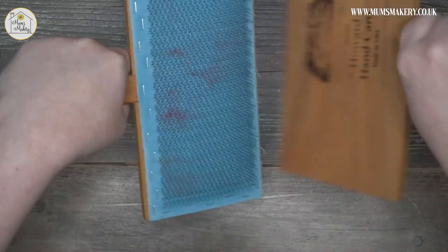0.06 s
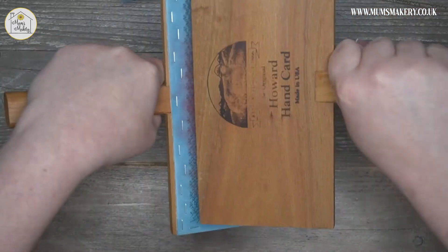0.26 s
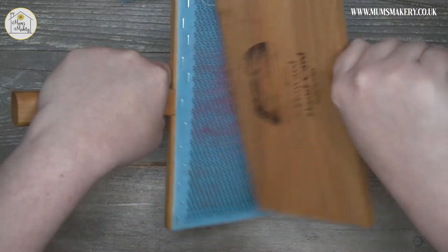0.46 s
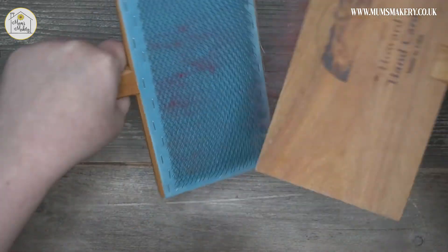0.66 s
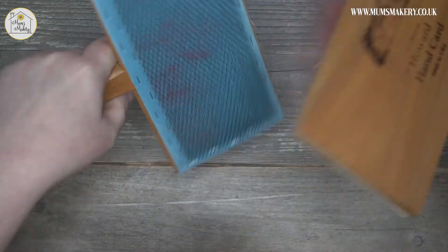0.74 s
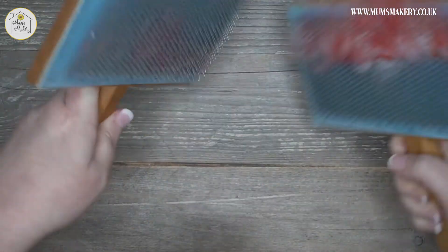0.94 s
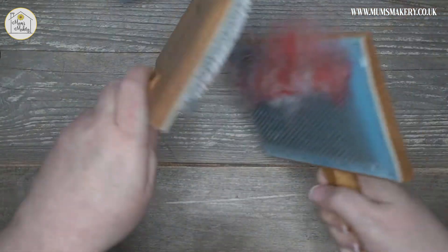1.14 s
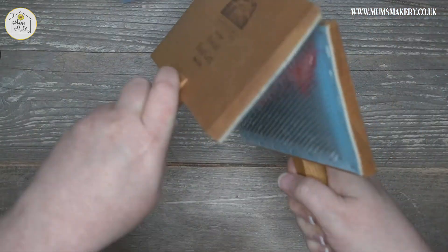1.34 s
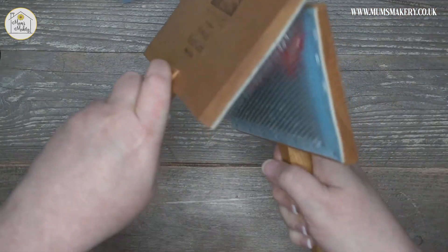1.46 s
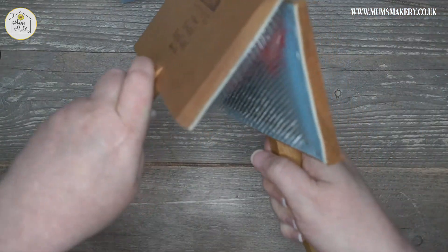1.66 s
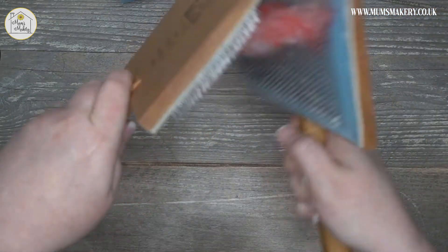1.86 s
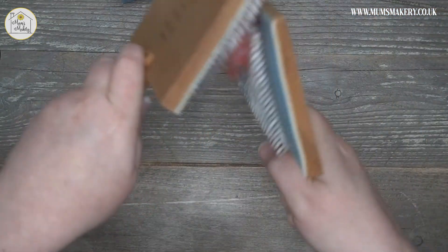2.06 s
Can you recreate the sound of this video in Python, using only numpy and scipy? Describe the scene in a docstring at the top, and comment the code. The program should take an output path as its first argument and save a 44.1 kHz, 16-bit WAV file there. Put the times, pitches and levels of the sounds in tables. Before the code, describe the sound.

Wire-toothed wool carders scrape past each other in short scratchy strokes, teeth twanging, close and dry

```python
"""A light scratch of wire teeth, then dull bumps: two wooden hand carders comb wool over a table, small room, close mic.
One card lands on the other and is dragged off in a rasp of slipping teeth, and the wool tears softly as they part.
Then they meet at an angle: single teeth snag and spring free as twanging clicks, and a short sweep lifts the wool.
Both strokes are noisy clicks through wire and wood filters, with noise ringing through the paddles' resonances.
A short room tail and a quiet rumbling floor lie behind; the one microphone feeds both channels alike."""
import sys
import numpy as np
from scipy import signal
from scipy.fft import rfft, irfft
from scipy.io import wavfile
from scipy.ndimage import uniform_filter1d

SR = 44100
rng = np.random.default_rng(int(sys.argv[2]) if len(sys.argv) > 2 else 0)


def persist_wave(psi):
    """Save psi, clipped to +-1, as 16-bit WAV."""
    counts = np.round(np.clip(psi, -1, 1) * 32767).astype(np.int16)
    wavfile.write(sys.argv[1], SR, np.atleast_2d(counts).T)


N = 92610
T = np.arange(N) / SR


def amp(db):
    """Turns dB into a linear gain."""
    return 10 ** (np.asarray(db) / 20)


def evened(x):
    """Scales to rms 1."""
    return x / np.sqrt(np.mean(x ** 2) + 1e-20)


def steady(x, size=700):
    """Holds the short-term level near 1 and leaves the fine grain alone."""
    power = uniform_filter1d(uniform_filter1d(x ** 2, size), size)
    return x / np.sqrt(power + 1e-12)


def read(points, hz):
    """Reads a curve over frequency on a log-frequency axis."""
    f, value = np.transpose(points)
    return np.interp(np.log(hz + 1), np.log(f + 1), value)


def level(rows, axis=1):
    """Gain over time from one dB column; silent outside the curve."""
    rows = np.array(rows)
    inside = (T >= rows[0, 0]) * (T <= rows[-1, 0])
    return amp(np.interp(T, rows[:, 0], rows[:, axis])) * inside


def add(mix, s, sound):
    """Mixes a sound in at time s."""
    part = mix[max(round(s * SR), 0):][:len(sound)]
    part += sound[:len(part)]


def colour(x, points, size=4096):
    """Causal minimum-phase filter with the given spectrum, keeping the power of white noise."""
    hz = abs(np.fft.fftfreq(size, 1 / SR))
    log_gain = np.log(amp(np.maximum(read(points, hz), -100)))
    # The Hilbert transform of the log gain gives the minimum phase.
    taps = np.fft.ifft(np.exp(np.conj(signal.hilbert(log_gain)))).real[:size // 2]
    return signal.fftconvolve(x, taps / np.linalg.norm(taps))[:len(x)]


def ring(x, hz, width):
    """One resonance, a decaying complex pole, keeping the power of white noise."""
    r = np.exp(-np.pi * width / SR)
    pole = r * np.exp(2j * np.pi * hz / SR)
    return signal.lfilter([np.sqrt(2 * (1 - r * r))], [1, -pole], x).real


def slips(per_s, spread_db, hiss):
    """Random clicks of teeth slipping over each other, with the hiss of the fibres between them."""
    size = amp(spread_db * np.minimum(rng.exponential(1, N), 3.5))
    clicks = size * rng.choice([-1, 1], N) * (rng.random(N) < per_s / SR)
    return evened(evened(clicks) + hiss * rng.standard_normal(N))


def burst(hold_s, decay_s, size=6000):
    """A short noise rattle that holds and dies away."""
    t = np.arange(size) / SR
    return rng.choice([-1., 1.], size) * np.exp(-np.maximum(t - hold_s, 0) / decay_s)


# Wires of the meshed beds. Each row: pitch in Hz, width in Hz, relative level in dB.
WIRE_MODES = [(2010, 30, -6.5), (3640, 300, -12), (4430, 40, -26.5), (7780, 150, -15.5)]
# Wooden paddle struck by its teeth; single snags use it too. Each row: frequency in Hz, relative level in dB.
PADDLE_SPECTRUM = [(60, -37.5), (170, -25), (290, -1), (550, 6.5), (800, -2.5), (1150, -0.5), (1600, -2),
                   (3000, -40)]
RING_ABOVE_HZ = 850  # higher paddle modes follow the ring curve, the others the wood curve


def drag(curve, wire_colour, modes, per_s, spread_db, wire_db, twang_db, wood_db, low_db, ring_db):
    """Slipping teeth rasp and twang; the paddle's modes ring as noise, and three curves shape wire, wood and ring."""
    drive = slips(per_s, spread_db, hiss=.5)
    wire = colour(drive, wire_colour)
    for hz, width, db in WIRE_MODES:
        wire += amp(twang_db + db) * ring(drive, hz, width)
    low_modes, high_modes = np.zeros((2, N))
    for hz, width, db in modes:
        mode = amp(db) * ring(rng.standard_normal(N), hz, width)
        if hz <= RING_ABOVE_HZ:
            low_modes += mode
        else:
            high_modes += mode
    wood = amp(wood_db) * colour(drive, PADDLE_SPECTRUM) + evened(low_modes)
    out = amp(wire_db) * steady(wire) * level(curve, axis=1)
    out += amp(low_db) * steady(wood) * level(curve, axis=2)
    # Hand and wool stop the modes as the pull eases: the ring curve falls away with the stroke.
    return out + amp(ring_db) * steady(high_modes) * level(curve, axis=3)


# The long pull. Each row: time in seconds, then wire rasp, wood and paddle ring in dB before the trims below.
LONG_PULL = [(0.28, -81, -71, -80), (0.3, -71.5, -61, -65), (0.386, -55, -47.5, -58),
             (0.394, -48, -40.5, -42.5), (0.415, -45, -41.5, -46), (0.447, -39.5, -41.5, -36.5),
             (0.458, -44.5, -50, -41), (0.468, -44, -45, -33.5), (0.484, -43, -41, -32.5),
             (0.498, -55.5, -59.5, -51), (0.538, -73.5, -62, -85), (0.56, -83, -79, -75)]
# Wire teeth in the long pull. Each row: frequency in Hz, relative level in dB.
PULL_SPECTRUM = [(760, -19), (1300, -3), (1430, -10), (1880, 3), (2000, -3.5), (2220, 2), (3010, -0.5),
                 (3760, -4), (4680, -9.5), (5900, -0.5), (6910, -7), (7750, -5.5), (9460, -17.5),
                 (14100, -15), (16000, -60)]
# Paddles with the cards flat together. Each row: pitch in Hz, width in Hz, relative level in dB.
FLAT_PADDLES = [(184.6, 29, -18), (266, 36, -11.5), (307, 25, -11), (353, 68, -7.5), (481, 26, -17),
                (544, 30, -16), (618, 25, -1), (699.6, 10, 3), (768, 20, -21), (864, 25, 0.5), (941, 22, 5),
                (1021, 18, 0), (1116, 22, 2.5), (1096, 18, -2), (1190, 40, 2), (1333, 22, 2.5)]


def long_drag():
    """One card is dragged off the other, teeth slipping while the flat paddles ring."""
    return drag(LONG_PULL, PULL_SPECTRUM, FLAT_PADDLES, per_s=2200, spread_db=3,
                wire_db=1, twang_db=2.5, wood_db=-3.5, low_db=0, ring_db=-2.5)


# The lifting sweep. Each row: time in seconds, then wire rasp, wood and paddle ring in dB before the trims below.
LIFTING = [(1.8, -55.5, -52, -42), (1.811, -40, -40, -42.5), (1.83, -41.5, -44.5, -40.5),
           (1.842, -51.5, -50, -48), (1.863, -55, -71, -51), (1.875, -67, -67, -66), (1.9, -82, -69, -75)]
# Wire teeth in the sweep. Each row: frequency in Hz, relative level in dB.
SWEEP_SPECTRUM = [(760, -16.5), (1300, 10), (1440, 9.5), (1820, -5.5), (2490, 3.5), (3010, -1.5),
                  (3790, 0.5), (4780, -6), (6350, -7), (6830, -3.5), (9270, -15), (12000, -19),
                  (16000, -35)]
# Paddles held at an angle. Each row: pitch in Hz, width in Hz, relative level in dB.
ANGLED_PADDLES = [(278, 130, 2), (427, 80, -5.5), (502, 110, 3.5), (713, 33, -1), (883, 27, 1),
                  (1028, 43, 5), (1148, 34, -10), (1480, 120, -7), (1917, 27, -5), (2610, 50, -29)]


def lift_sweep():
    """A short sweep lifts the wool: denser slips, less twang, and broader paddle modes."""
    return drag(LIFTING, SWEEP_SPECTRUM, ANGLED_PADDLES, per_s=3500, spread_db=2,
                wire_db=-0.5, twang_db=-17, wood_db=-3.5, low_db=-1, ring_db=-3.5)


# Single teeth springing free. Each row: start in seconds, snap in dB before its filter, wire pitch in Hz,
# wire level in dB, wood knock in dB before its filter.
SPRINGING_TEETH = [(0.2204, -60, 2500, -39.5, -60), (0.2607, -55, 3740, -45, -44.5),
                   (0.3965, -53, 2040, -38.5, -46), (0.410, -37, 2020, -37.5, -36.5),
                   (0.423, -41.5, 2020, -33, -59), (0.4352, -39, 3650, -30, -45),
                   (0.447, -31.5, 3750, -27, -41), (0.4525, -37.5, 3550, -45, -56),
                   (0.464, -33, 3790, -28, -51), (0.4695, -33.5, 1148, -32, -38.5),
                   (0.4801, -34.5, 988, -41, -37), (0.663, -68.5, 2540, -64, -84),
                   (0.7828, -56.5, 2260, -45.5, -72), (0.784, -72, 3060, -48.5, -73),
                   (1.3, -47, 1820, -47, -47), (1.307, -46.5, 3910, -41, -46.5),
                   (1.343, -48, 1103, -48.5, -66), (1.3483, -44.5, 3440, -47.5, -49),
                   (1.364, -46, 3420, -44, -47), (1.376, -56, 3360, -46, -70),
                   (1.389, -47.5, 3390, -33.5, -49), (1.3966, -41.5, 6000, -46, -47),
                   (1.4089, -60, 1090, -57, -45.5), (1.421, -63, 1220, -71, -78),
                   (1.4454, -60, 3300, -49.5, -51), (1.4497, -56, 1155, -62, -44.5),
                   (1.4731, -46, 1226, -55, -45.5), (1.498, -51, 2280, -49.5, -58),
                   (1.5165, -47, 4540, -48, -49), (1.536, -43.5, 1600, -61, -44),
                   (1.5709, -52, 715, -63, -47.5), (1.5967, -55, 2340, -52.5, -63),
                   (1.6183, -59, 2090, -53, -69), (1.6267, -47.5, 1413, -48, -45),
                   (1.6312, -51, 1394, -48, -47), (1.6567, -45.5, 8100, -41.5, -47.5),
                   (1.679, -47, 1920, -50, -51), (1.6902, -51.5, 1360, -54, -72),
                   (1.707, -55.5, 1390, -45, -49), (1.7918, -52, 1540, -49, -52),
                   (1.8141, -40.5, 1087, -34.5, -48), (1.8252, -41.5, 7800, -38, -50),
                   (1.83, -40, 2350, -39, -43.5), (1.8341, -60, 2470, -36.5, -68),
                   (1.848, -66, 3850, -39, -53), (1.86, -60, 3950, -44, -72),
                   (1.864, -70, 1066, -46.5, -77)]
# Faint ticks of handling. Each row: start in seconds, level in dB before the snap filter.
HANDLING_TICKS = [(0.175, -66.5), (0.286, -62), (0.722, -65.5), (0.805, -67), (0.857, -64), (1.213, -66)]
# The snap of a tooth. Each row: frequency in Hz, relative level in dB.
SNAP_SPECTRUM = [(760, -6.5), (1300, -32), (1440, -6), (1600, -6.5), (2740, -5), (3380, -2), (5310, -5),
                 (8080, -10), (14600, -27.5), (16000, -24)]
SNAP_S, KNOCK_S = 0.0024, 0.0045  # decay times in seconds
WIRE_CYCLES = 6.7  # cycles in which a twang falls to 1/e


def snags(size=6000):
    """A caught tooth snaps free, twangs briefly and knocks the paddle; handling ticks share its snap."""
    snap, wire, wood = np.zeros((3, N))
    t = np.arange(size) / SR
    for s, snap_db, hz, wire_db, wood_db in SPRINGING_TEETH:
        twang = np.sin(2 * np.pi * hz * t) * np.exp(-t * hz / WIRE_CYCLES)
        add(snap, s, amp(snap_db) * burst(0.00017, SNAP_S))
        add(wire, s, amp(wire_db) * twang)
        add(wood, s, amp(wood_db) * burst(0.00038, KNOCK_S))
    for s, db in HANDLING_TICKS:
        add(snap, s, amp(db) * burst(0.00019, SNAP_S))
    return colour(snap, SNAP_SPECTRUM) + wire + colour(wood, PADDLE_SPECTRUM)


# Beds of teeth meeting or parting. Each row: start in seconds, level in dB before the filter,
# hold in seconds, decay in seconds.
BEDS_MEETING = [(0.217, -45, 0.012, 0.01), (0.251, -55.5, 0.012, 0.017), (0.783, -53.5, 0.0011, 0.0054),
                (1.287, -54, 0.017, 0.017), (1.802, -46, 0.0039, 0.015), (2.093, -48, 0.017, .01)]
# The crunch of the beds. Each row: frequency in Hz, relative level in dB.
CRUNCH_SPECTRUM = [(90, -13.5), (200, -4.5), (420, 4), (700, 0), (1100, -0.5), (1720, -8.5), (2500, -5),
                   (3700, -10), (4400, -12.5), (5700, -12.5), (8900, -27), (12700, -35), (16000, -50)]


def landings():
    """Many teeth touch or part almost at once in a short crunch of filtered noise."""
    out = np.zeros(N)
    for s, db, hold_s, decay_s in BEDS_MEETING:
        add(out, s, amp(db) * burst(hold_s, decay_s))
    return colour(out, CRUNCH_SPECTRUM)


# Dull bumps of paddle and hand. Each row: start in seconds, level in dB before doubling and the envelope,
# pitch in Hz, decay in seconds.
HAND_BUMPS = [(0.156, -53, 120, 0.0053), (0.264, -57, 173, 0.023), (0.16, -70.5, 452, 0.01),
              (0.2295, -32.5, 450, 0.0032), (0.231, -35.5, 163, 0.0033), (0.233, -55.5, 79, 0.02),
              (1.298, -44, 102.4, 0.0043), (1.306, -37.5, 464, 0.0019), (1.812, -61, 144, 0.014),
              (1.992, -53, 108, 0.0055)]


def bumps(rise_s, size=8000):
    """Low knocks of the paddles in the hands: damped sines with a soft rise."""
    out, t = np.zeros(N), np.arange(size) / SR
    for s, db, hz, decay_s in HAND_BUMPS:
        envelope = (1 - np.exp(-t / rise_s)) * np.exp(-t / decay_s)
        add(out, s, 2 * amp(db) * np.sin(2 * np.pi * hz * t) * envelope)
    return out


# Light contact of the teeth, one curve per contact. Each row: time in seconds, level in dB before the trim.
LIGHT_CONTACTS = [
    [(0.0, -58), (0.04, -70.5), (0.12, -110)],
    [(1.283, -61), (1.295, -58), (1.346, -57), (1.41, -54.5), (1.466, -59), (1.514, -61), (1.55, -57),
     (1.61, -67), (1.665, -59), (1.72, -65.5), (1.79, -64.5)],
    [(1.88, -76.5), (2.0, -72.5), (2.065, -77), (2.1, -51)],
]
# The light scratch. Each row: frequency in Hz, relative level in dB.
SCRATCH_SPECTRUM = [(100, -18.5), (210, -17.5), (280, -3.5), (540, -2.5), (790, -3), (1100, -6.5),
                    (1660, -10.5), (2870, -13), (3500, -15), (5360, -19), (8070, -23.5), (12000, -34),
                    (16000, -41)]


def graze(graze_db):
    """Teeth brush lightly in a grainy scratch of slips and hiss."""
    drive = slips(per_s=1600, spread_db=3, hiss=.6)
    scratch = steady(colour(drive, SCRATCH_SPECTRUM))
    return amp(graze_db) * scratch * sum(level(curve) for curve in LIGHT_CONTACTS)


# Wool fibres pulling apart in the air. Each row: time in seconds, level in dB before the filter.
FIBRES_PARTING = [(0.62, -92), (0.74, -76.5), (0.8, -71.5), (0.86, -72), (0.92, -76), (1.03, -86),
                  (1.09, -78.5), (1.15, -83.5), (1.26, -79)]
# The tearing wool. Each row: frequency in Hz, relative level in dB.
FIBRE_SPECTRUM = [(300, -11.5), (700, 0), (1700, -10.5), (2350, -4), (2800, 1), (3400, -5.5), (4800, -7.5),
                  (8000, -10), (16000, -21.5)]


def wool():
    """Fibres tear softly as the cards part: nearly even clicks in hiss, filtered."""
    tearing = slips(per_s=1200, spread_db=0.5, hiss=0.66)
    return colour(tearing * level(FIBRES_PARTING), FIBRE_SPECTRUM)


# Small room around the table. Each row: frequency in Hz, time to fall by 60 dB in seconds.
ROOM_DECAY = [(100, 0.46), (500, 0.22), (1100, 0.2), (2000, 0.21), (4000, 0.19), (15000, 0.19)]
ROOM_DB = -19  # level of the tail against the close sound


def room(x, size=22050):
    """A short diffuse noise tail, starting after 4 ms, whose low end lasts longest."""
    noise = rng.standard_normal(size) * (np.arange(size) / SR > .004)
    hz, t, z = signal.stft(noise, SR, nperseg=256)
    decay = amp(-60 * t / read(ROOM_DECAY, hz)[:, None])
    tail = signal.istft(z * decay, SR, nperseg=256)[1]
    return signal.fftconvolve(x, tail / np.linalg.norm(tail))[:N]


# The still room. Each row: frequency in Hz, relative level in dB.
STILL_ROOM = [(15, -22), (30, 1), (43, 3.5), (70, -3), (113, -11), (270, -9), (350, -14), (430, -24),
              (680, -20), (1100, -25), (1400, -27.5), (2750, -33.5), (4060, -32.5), (11400, -37),
              (13000, -56), (16000, -54)]
FLOOR_DB = -70  # rms level


def floor():
    """Low rumble and faint hiss of the room: noise shaped by its spectrum."""
    gain = amp(read(STILL_ROOM, np.fft.rfftfreq(N, 1 / SR)))
    noise = irfft(rfft(rng.standard_normal(N)) * gain, N)
    return amp(FLOOR_DB) * evened(noise)


def scene():
    """Both strokes and all small contacts with their room, the same in both channels."""
    cards = long_drag() + lift_sweep() + snags() + landings()
    cards += bumps(rise_s=.0015) + graze(graze_db=-1.0) + wool()
    mono = cards + amp(ROOM_DB) * room(cards) + floor()
    return np.array([mono, mono])


EDGE_HZ = 15900


def record(dry):
    """The recorder's band limit: a steep linear-phase low-pass."""
    low_pass = signal.firwin(511, EDGE_HZ, window=("kaiser", 9), fs=SR)
    return signal.oaconvolve(dry, low_pass[None], "same")


dry = scene()
out = record(dry)
persist_wave(out)
```